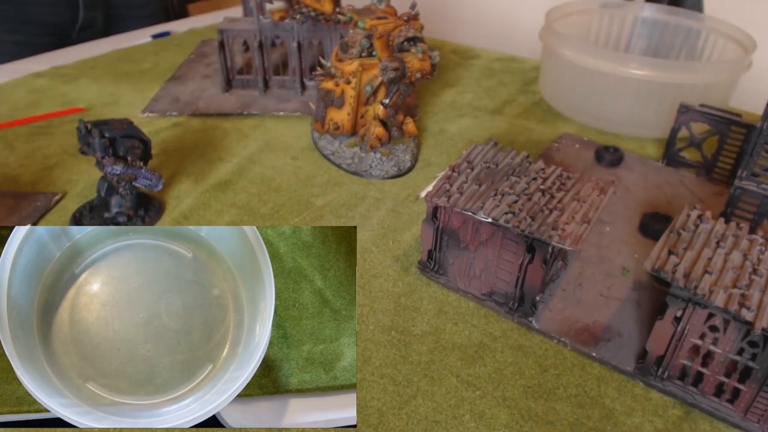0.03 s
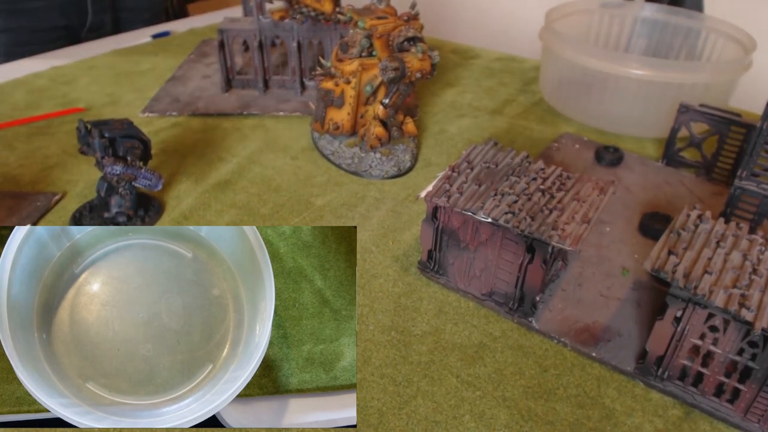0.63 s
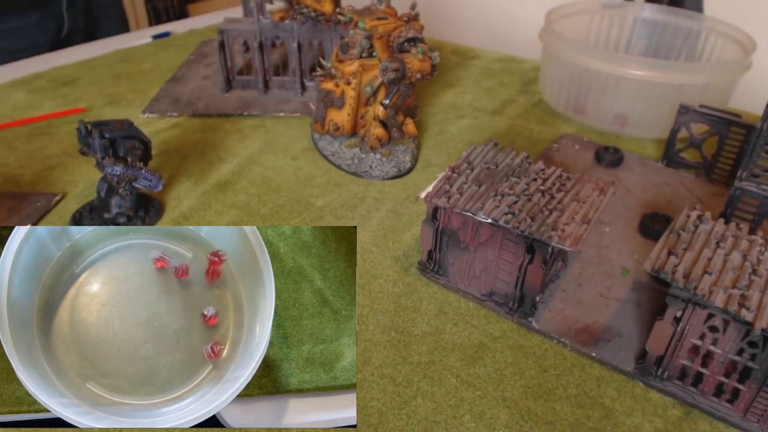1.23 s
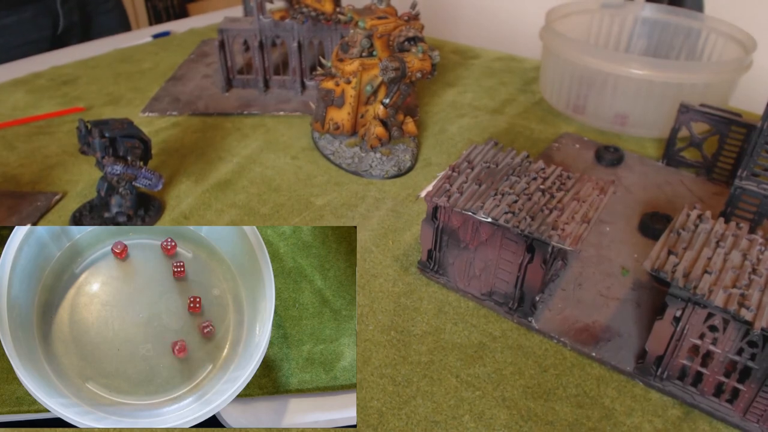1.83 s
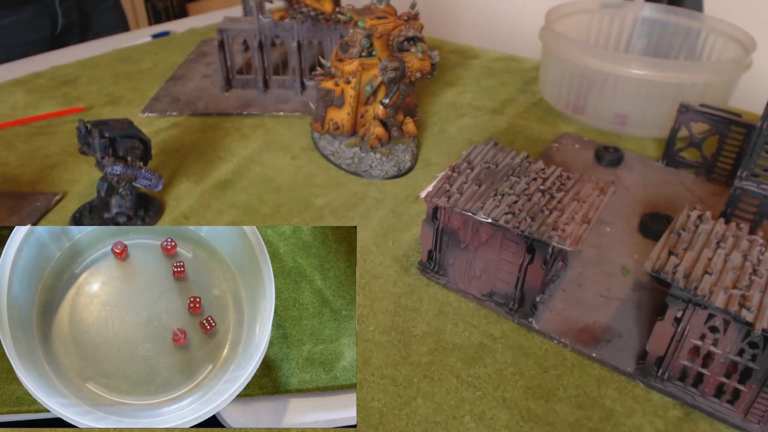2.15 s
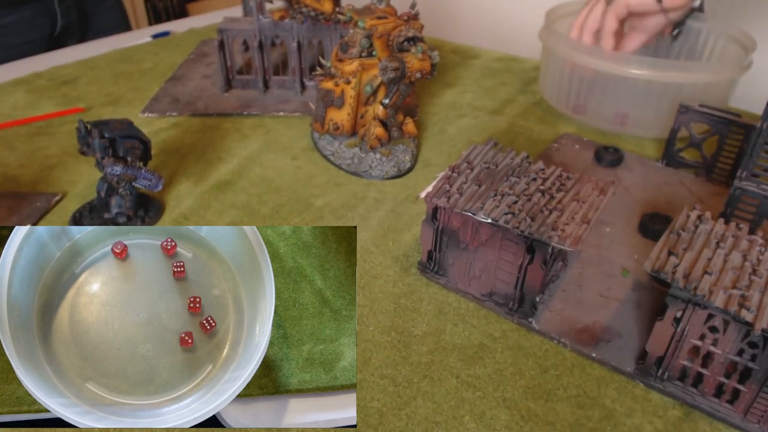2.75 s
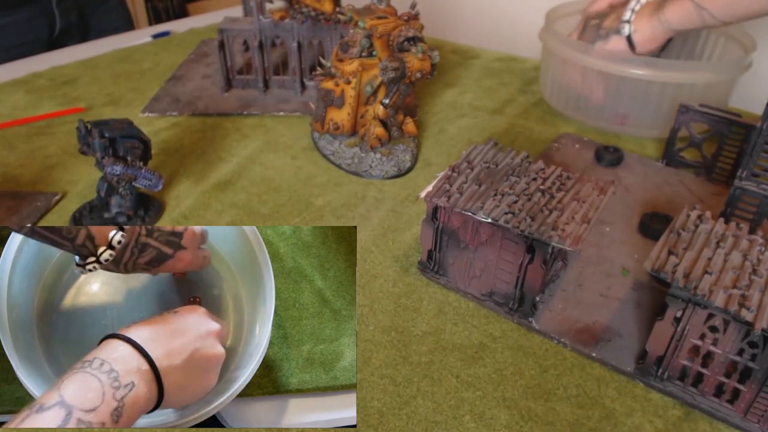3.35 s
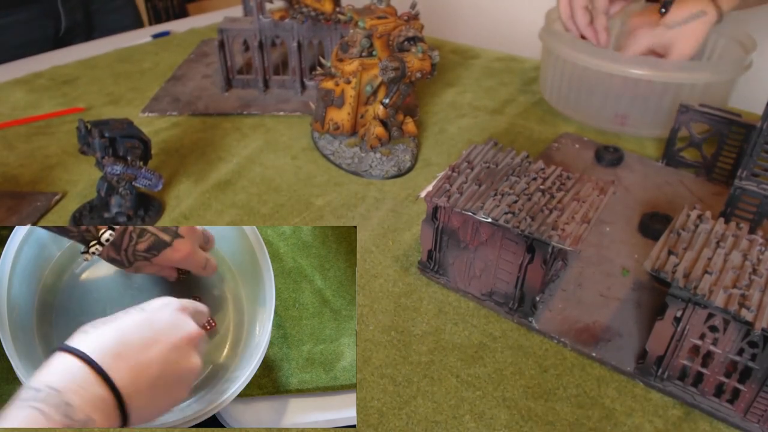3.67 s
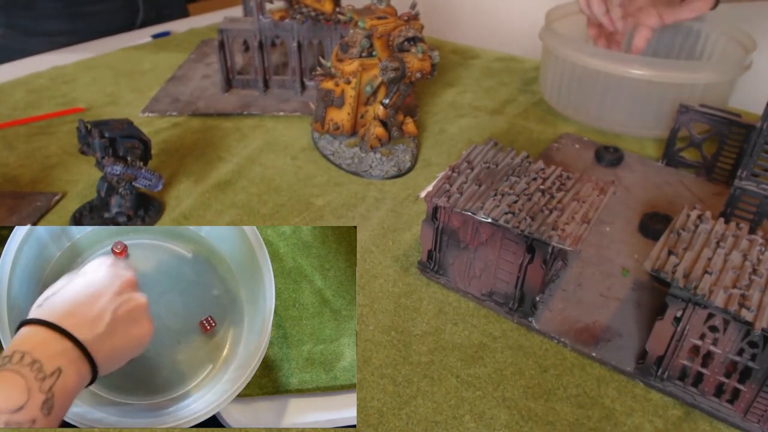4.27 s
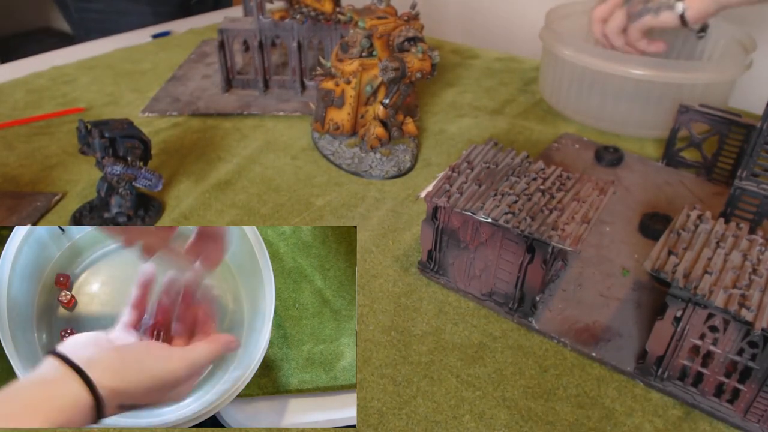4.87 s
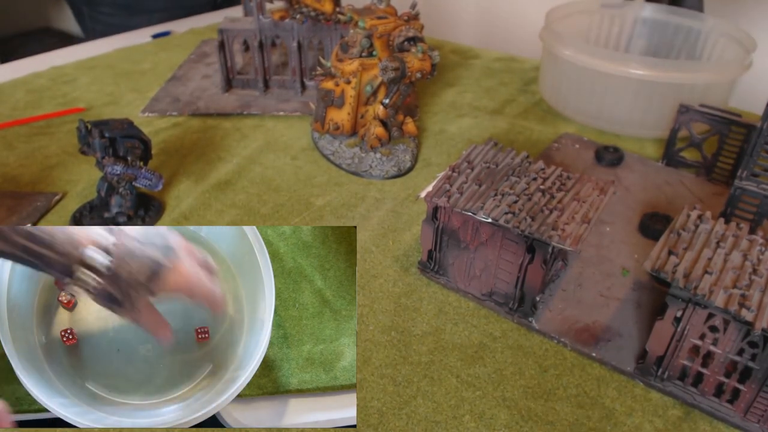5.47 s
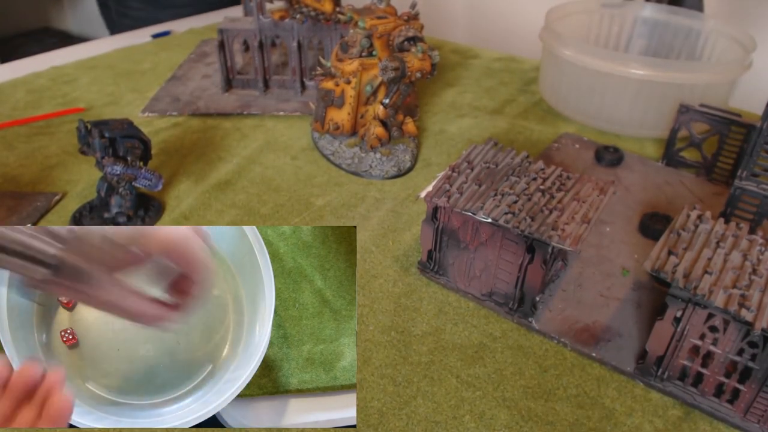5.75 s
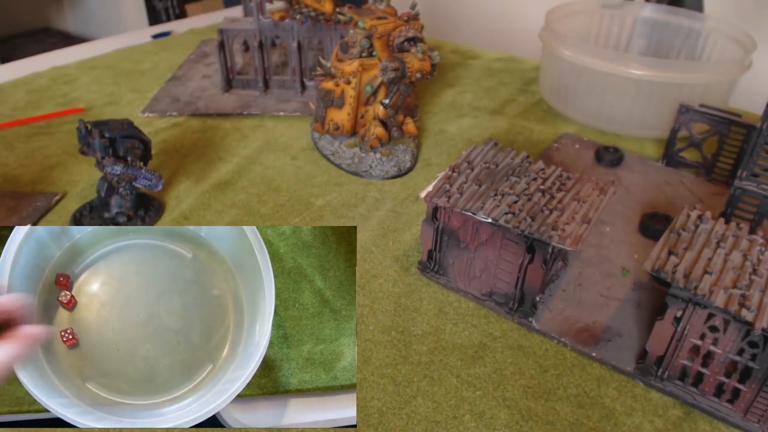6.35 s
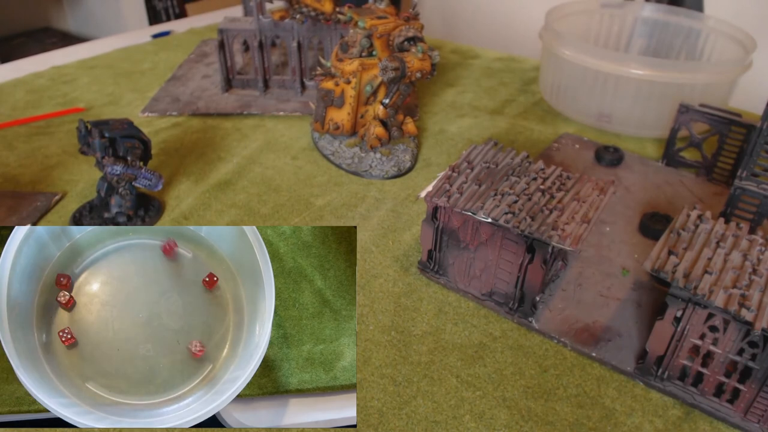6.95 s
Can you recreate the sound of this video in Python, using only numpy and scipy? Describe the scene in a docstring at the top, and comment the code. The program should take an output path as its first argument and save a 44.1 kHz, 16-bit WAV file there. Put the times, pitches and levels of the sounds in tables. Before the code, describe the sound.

Dice clatter into a plastic tub and spin to rest, are scooped up clicking, then get thrown in again.

```python
"""A click's hiss fades; dice stir in a hand, then clatter into a round plastic tub on a cloth-covered
table, and one spins on. Hands sweep them up, drop a few back, click them together and throw again.
Each blow flexes the tub's floor, cracks through its walls and leaves it ringing; die on die gives a short,
high ping. A small room answers, over faint hiss and mains buzz. The sound is nearly mono, and a gain
control ducks at the loud throws."""
import sys
import numpy as np
from scipy import signal
from scipy.fft import rfft, irfft
from scipy.io import wavfile

SR = 44100
rng = np.random.default_rng(int(sys.argv[2]) if len(sys.argv) > 2 else 0)


def store_pcm(level_fs):
    """Save levels as 16-bit WAV."""
    pcm = np.round(np.clip(level_fs, -1, 1) * 32767).astype(np.int16)
    wavfile.write(sys.argv[1], SR, np.atleast_2d(pcm).T)


N = 313551
TIME_S = np.arange(N) / SR
AGE_S = np.arange(int(.4 * SR)) / SR  # time since a hit
ATTACK_SAMPLES = int(.004 * SR)
TOP_HZ = 16200

# die hits tub, floor near 1200 Hz, wall near 2500 Hz: (time [s], level [dB], tick [dB], spot pitch [Hz])
BOUNCES = [(1.0864, -7, -12, 2090), (1.0882, -4, -9.5, 1960), (1.0922, -4.5, -16, 1260),
           (1.0978, -5.5, -10, 1130), (1.1172, -13, -8, 1210), (1.1222, -29, -24, 1080),
           (1.1619, -6, -15, 1125), (1.1705, -13, -12, 2400), (1.1885, -18, -10, 2470),
           (1.2604, -17.5, -16.5, 1660), (1.2975, -33, -15, 1260), (1.3173, -18.5, -10.5, 1200),
           (1.3316, -18.5, -11, 1250), (1.345, -16.5, -15.5, 1200), (1.3865, -25, -11, 1170),
           (1.4624, -32.5, -33, 1260), (1.4693, -31.5, -12.5, 1320), (1.5145, -27.5, -18, 1290),
           (1.5271, -28.5, -31, 1170), (1.5526, -32, -23, 1120), (1.571, -36.5, -32, 1100),
           (1.6033, -37.5, -17, 1040), (1.6249, -30, -15, 2820), (1.673, -36, -10, 1100),
           (1.7016, -42, -6, 1220), (1.7647, -47, -16, 1740), (1.8254, -43, -21.5, 1097),
           (2.0288, -38.5, -29.5, 1220), (2.177, -34.5, -25, 1803), (2.198, -43.5, -25, 1200),
           (2.5755, -46, -24.5, 1275), (2.5989, -44, -19.5, 1159), (2.6401, -58, -5.5, 1070),
           (3.3716, -41.5, -14.5, 1540), (3.377, -44.5, -26.5, 1530), (3.4491, -50, -18, 1370),
           (3.5138, -45.5, -26, 1225), (3.5608, -47.5, -15.5, 1390), (3.7468, -50.5, -25.5, 1030),
           (4.1535, -39.5, -25, 1700), (4.2126, -26, -14, 2600), (4.2802, -23.5, -17, 1980),
           (4.3091, -30, -12, 2580), (4.3745, -29, -14, 2600), (4.3765, -17, -15.5, 2520),
           (4.4055, -23, -21, 2500), (4.4513, -26, -12, 2820), (4.4983, -35.5, -29, 514),
           (4.504, -40, -29, 524), (4.5388, -42, -14, 1530), (4.5934, -42.5, -13, 2580),
           (4.6434, -34, -10.5, 2120), (4.6716, -38.5, -17.5, 745), (5.1735, -47, -12, 2580),
           (5.5771, -42, -20, 2000), (5.585, -39.5, -15, 699), (6.6793, -9.5, -13, 1205),
           (6.6807, -12.5, -9, 1140), (6.691, -10.5, -10.5, 2730), (6.7118, -20, -29, 2480),
           (6.7415, -17, -20, 2530), (6.7621, -26.5, -9, 1220), (6.783, -23, -19, 2520),
           (6.8001, -20.5, -11, 1300), (6.828, -22, -13.5, 1260), (6.8325, -27, -7, 1270),
           (6.841, -27, -16, 1230), (6.8937, -31.5, -15, 1280), (6.9385, -34.5, -21, 1310),
           (6.9745, -42.5, -33, 1260), (7.071, -37, -24, 2100), (7.0772, -29.5, -30, 2110),
           (7.1066, -28.5, -29, 2200)]
# second corner landing, weak after a hard bounce: (blow level [dB], relative level [dB])
SECOND_CORNER = [(-52.5, -0.5), (-16.5, -17)]
def knocks(count, ring_db=-19, corner_db=-2, low_cut_hz=130):
    """Dice strike the thin tub, which radiates little bass. Returns cracks by place, and tones."""
    cracks, tones = np.zeros((count, N)), np.zeros(N)
    modes = tub_modes()
    for k, (time_s, db, tick_db, hz) in enumerate(list(BOUNCES) + spins() + tumbles()):
        spot, wall = spot_flex(hz), wall_crack(db)
        corner_gain = undb(db + tick_db + corner_db)
        tick = corner_gain * corner_tick()
        tub = undb(db + ring_db) * tub_ring(modes)
        snap = corner_gain * corner_snap()
        body_gain = undb(db) / attack_rms(wall + spot)
        crack, flex = body_gain * high_pass(wall, 160), body_gain * spot
        add(cracks[k % count], time_s, crack + tick)
        add(tones, time_s, flex + tub + snap)
        second_gain = undb(np.interp(db, *np.transpose(SECOND_CORNER)))
        add(tones, time_s + rng.uniform(.0014, .006), second_gain * (crack + flex))
    return high_pass(cracks, low_cut_hz), high_pass(tones, low_cut_hz)


# flex of a struck spot: (pitch [Hz], t60 [s], level re wall [dB])
SPOT_FLEX = [(500, .03, -3.5), (1206, 0.023, -2), (2000, 0.015, -2), (2600, 0.01, 3)]
def spot_flex(hz):
    """The struck spot rings briefly; thin plastic pushes no air at low pitch."""
    tone = high_pass(ring(hz, along(SPOT_FLEX, hz)), 600, order=3)
    return undb(along(SPOT_FLEX, hz, column=2)) * unit_hit(tone)


# short, overlapping wall resonances: (frequency [Hz], level [dB])
WALL_SPECTRUM = [(60, -35), (150, -23), (400, -17.5), (500, 0.5), (740, -2.5), (850, -6.5), (1150, -1),
                 (1750, -1), (2000, 1), (2700, 0.5), (3100, -3.5), (5000, -16.5), (9000, -26.5),
                 (16000, -39.5)]
# brightness of a landing: (blow level [dB], cutoff [Hz])
WALL_CUTOFF = [(-43.5, 2200), (-40, 14000)]
def wall_crack(db):
    """A blow cracks through the walls; a gentle one pushes longer and sounds duller."""
    crack = colour(contact(scatter_db=2, t60_s=.019, build_s=.00039), WALL_SPECTRUM)
    return unit_hit(low_pass(crack, np.interp(db, *np.transpose(WALL_CUTOFF))))


# corner tick: (frequency [Hz], level [dB])
TICK_SPECTRUM = [(100, -40.5), (500, -21), (1500, -3.5), (3800, 4), (7000, 0), (11000, -7.5), (16000, -21)]
def corner_tick():
    """A hard corner lands with a bright tick."""
    return unit_hit(colour(contact(scatter_db=0, t60_s=.025), TICK_SPECTRUM))


def corner_snap():
    """The die itself gives a brief, high ping as its corner lands."""
    return unit_hit(high_pass(ring(rng.uniform(3600, 5600), .0014), 2500))


# tub resonances: (frequency [Hz], level [dB], t60 [s])
TUB_MODES = [(503, 7.5, .33), (572, 3, .26), (655, -3, .2), (718, -2, .2), (790, -6, .18), (920, -3, .22),
             (970, -2, .24), (1096, 1, .24), (1140, 0, .2), (1184, 0, .22), (1262, -3, .24),
             (1298, -1, .22), (1456, 2, .22), (1510, 0, .2), (1720, -4, .18), (1955, 0, .16),
             (2129, -1, .18), (2348, -3, .18), (2560, -1, .16), (2692, -1, .15)]
def tub_modes():
    """Free decay of the tub, one row per mode."""
    return np.array([undb(db) * ring(hz, t60_s) for hz, db, t60_s in TUB_MODES])


def tub_ring(modes, spread_db=2):
    """Where the die lands decides how strongly each mode takes up the blow."""
    polarity, strength = rng.standard_normal((2, len(modes)))
    weights = np.sign(polarity) * undb(spread_db * strength)
    return weights @ modes / np.sqrt(len(modes) / 2)


# spinning die: (start [s], end [s], first gap [s])
SPINS = [(1.94, 2.15, .046), (2.2567, 2.65, .0493)]
def spins(first_db=-43.5, fade_db_per_s=15.5, quicken_s=.0028):
    """A spinning die sinks, tapping corner after corner, sooner and softer."""
    rows = []
    for start_s, end_s, gap_s in SPINS:
        age_s = np.append(0, np.cumsum(gap_s - quicken_s * np.arange(14)))
        age_s = age_s[age_s < end_s - start_s]
        rows += taps(start_s + age_s, first_db - fade_db_per_s * age_s, tick_db=-20.5)
    return rows


# light tumbling between bounces: (start [s], end [s], first level [dB], last level [dB])
TUMBLES = [(1.12, 1.558, -36, -47.5), (1.662, 1.92, -49.5, -50), (3.463, 3.697, -57, -62.5),
           (4.218, 4.676, -49, -52), (6.72, 7.07, -33, -48)]
def tumbles(count=10):
    """Tumbling dice touch down at uneven moments and lose strength."""
    rows = []
    for start_s, end_s, first_db, last_db in TUMBLES:
        progress = (np.arange(count) + rng.random(count)) / count
        times_s = start_s + progress * (end_s - start_s)
        rows += taps(times_s, first_db + progress * (last_db - first_db), tick_db=-14)
    return rows


def taps(times_s, levels_db, tick_db, floor_hz=1220, spread_db=1.7, pitch_spread=.055):
    """Light, slightly varied blows on the tub's floor, as rows like BOUNCES."""
    jitter = rng.standard_normal((len(times_s), 2))
    return [(time_s, db + spread_db * force, tick_db, floor_hz * np.exp(pitch_spread * detune))
            for time_s, db, (force, detune) in zip(times_s, levels_db, jitter)]


# die on die in the hand: (time [s], level [dB], pitch [Hz])
CLICKS = [(0.095, -52, 7300), (0.9045, -50, 5830), (0.9567, -50, 4900), (0.9622, -45, 4670),
          (0.9691, -37, 9200), (0.9794, -37, 5650), (0.9963, -48, 5137), (3.762, -52.5, 2630),
          (3.7709, -45, 5100), (3.778, -49.5, 6030), (4.9254, -43, 6605), (5.2085, -55, 4740),
          (5.3137, -45, 5200), (5.4613, -53, 6840), (5.4866, -54, 6740), (5.6285, -47.5, 6160),
          (6.0067, -31, 7870), (6.0142, -38, 7000), (6.0491, -47, 5060), (6.0851, -47.5, 7200),
          (6.1009, -52, 6370), (6.1286, -37, 6080), (6.1421, -44, 4630), (6.1509, -44, 6000),
          (6.2052, -31.5, 8200), (6.209, -37, 8300), (6.4466, -49.5, 5340), (6.5305, -50.5, 6500),
          (6.566, -41.5, 7080), (6.5752, -42, 5350)]
# broad snap of a click: (frequency [Hz], level [dB])
SNAP_SPECTRUM = [(300, -30.5), (1200, -15.5), (2200, -2.5), (3000, -6), (4200, -1.5), (8000, 0),
                 (11000, -12), (16000, -22.5)]
# air resonances of the cupped hand: (frequency [Hz], level [dB], t60 [s])
HAND_MODES = [(2050, -1, 0.026), (3540, -0.5, .03), (4170, 0, .03), (5600, -1.5, .025)]
# lighter touches are duller: (click level [dB], cutoff [Hz])
CLICK_CUTOFF = [(-50, 9000), (-31, 15000)]
def clicks(count, ping_db=2, hollow_db=-10):
    """Die on die: a short ping and a snap, scattered by the cupped hand; one track per place."""
    out = np.zeros((count, N))
    for k, (time_s, db, hz) in enumerate(CLICKS):
        snap = unit_hit(colour(contact(scatter_db=0, t60_s=.075), SNAP_SPECTRUM))
        ping = unit_hit(high_pass(ring(hz, t60_s=.0026), 2100))
        hollow = unit_hit(sum(rng.choice([-1, 1]) * undb(mode_db) * ring(mode_hz, t60_s)
                              for mode_hz, mode_db, t60_s in HAND_MODES))
        click = snap + undb(ping_db) * ping + undb(hollow_db) * hollow
        cutoff_hz = np.interp(db, *np.transpose(CLICK_CUTOFF))
        add(out[k % count], time_s, undb(db) * unit_hit(low_pass(click, cutoff_hz, order=4)))
    return out


# skids on the wall: (peak [s], rise [s], fall [s], level [dB], pitch at peak [Hz], glide [Hz/s])
SKIDS = [(4.15, 0.05, .014, -42.5, 1860, 13997.5), (4.189, .035, 0.029, -40.5, 2405, 30000),
         (4.234, 0.03, 0.034, -42, 2000, -8000)]
def skid(width_hz=520, range_hz=(1200, 2820)):
    """Skidding dice chatter unevenly: a rough band whose pitch follows their speed."""
    roughness = low_pass(rng.standard_normal(N), width_hz)
    out = np.zeros(N)
    for peak_s, rise_s, fall_s, db, hz, glide_hz_per_s in SKIDS:
        pitch_hz = np.clip(hz + glide_hz_per_s * (TIME_S - peak_s), *range_hz)
        chatter = roughness * np.sin(2 * np.pi * np.cumsum(pitch_hz) / SR)
        out += unit(chatter) * stroke(peak_s, rise_s, fall_s, db)
    return out


# slides on the floor, spinning or swept by hand: (peak [s], rise [s], fall [s], level [dB])
DRAGS = [(2.1, .7, .9, -62), (3.56, 0.4, 0.45, -61), (4.22, 0.14, 0.062, -51), (4.62, 0.27, .14, -53),
         (5.2, 0.16, 0.29, -53), (5.6, 0.15, 0.075, -51.5)]
def drag(slips_per_s=1100, spread_db=3, ring_db=-16, cutoff_hz=2600):
    """Sliding dice catch and slip in tiny steps that sound through the tub."""
    slips = (rng.random(N) < slips_per_s / SR) * rng.standard_normal(N)
    slips *= undb(spread_db * rng.standard_normal(N))
    tub = unit_hit(sum(rng.choice([-1, 1]) * mode for mode in tub_modes()))
    wall = unit_hit(colour(contact(scatter_db=12, t60_s=.0079), WALL_SPECTRUM))
    scrape = signal.fftconvolve(slips, wall + undb(ring_db) * tub)[:N]
    return unit(low_pass(scrape, cutoff_hz, order=1)) * strokes(DRAGS)


# a click's fading hiss at the start, then dice rubbing in the palm or as they drop:
# (peak [s], rise [s], fall [s], level [dB])
DICE_HISSES = [(0, .02, 0.037, -42.5), (.097, 0.019, 0.054, -50), (.46, 0.058, 0.19, -63.5),
               (3.33, .2, .5, -70), (3.775, .017, 0.06, -49), (4.395, .02, .1, -44.5),
               (6.15, .03, 0.07, -55), (6.22, 0.022, 0.052, -50.5), (6.58, .25, .06, -66)]
# tone of that hiss: (frequency [Hz], level [dB])
DICE_HISS_SPECTRUM = [(1000, -26), (3500, -18), (5500, 2), (6700, 2), (8500, -6.5), (16000, -39)]
def dice_hiss(grain_db=4, grain_samples=90):
    """A fine, grainy hiss: the tail of a click, then dice grinding lightly together."""
    levels_db = grain_db * rng.standard_normal(N // grain_samples + 1)
    grain = undb(np.repeat(levels_db, grain_samples)[:N])
    return unit(colour(grain * rng.standard_normal(N), DICE_HISS_SPECTRUM)) * strokes(DICE_HISSES)


# arm movements: (peak [s], rise [s], fall [s], level [dB])
ARM_MOVES = [(.29, 0.085, 0.36, -62), (.68, 0.43, 0.44, -57.5), (1.07, 0.17, 0.081, -58),
             (2.78, .04, .09, -67), (5.28, 0.3, 0.34, -60.5), (6.32, .12, 0.27, -66.5),
             (6.56, .3, 0.25, -63)]
# sleeve rustle: (frequency [Hz], level [dB])
SLEEVE_SPECTRUM = [(60, -10.5), (200, -5), (500, 1), (1200, -1), (2500, -6), (6000, -16), (16000, -26.5)]
def sleeve():
    """A soft rustle as the arm moves over the tub."""
    return unit(colour(rng.standard_normal(N), SLEEVE_SPECTRUM)) * strokes(ARM_MOVES)


# reverberation: (frequency [Hz], level [dB], t60 [s])
ROOM_BANDS = [(150, -4.5, 0.34), (514, -1.5, 0.24), (1200, 9, 0.26), (2500, -7, 0.32), (4850, -4, 0.36),
              (8950, -8, .26), (15000, 3.5, 0.06)]
def room_tails(count=7, octaves=9, build_s=.0024):
    """Small-room reflections for several places; they build quickly and the top octave dies first."""
    noise = rfft(rng.standard_normal((count, len(AGE_S))))
    octave = np.log2(np.maximum(np.fft.rfftfreq(len(AGE_S), 1 / SR), 1))
    tails = 0
    for hz in TOP_HZ / 2 ** np.arange(octaves):
        band = irfft(noise * np.maximum(1 - abs(octave - np.log2(hz)), 0), len(AGE_S))
        tails += band * undb(along(ROOM_BANDS, hz)) * fade(along(ROOM_BANDS, hz, column=2))
    tails *= 1 - np.exp(-AGE_S / build_s)
    return tails / np.sqrt(np.sum(tails ** 2, axis=1, keepdims=True))


def diffuse(places, tails):
    """Smear each place's sound with its own tail, and sum."""
    return signal.oaconvolve(places, tails, axes=1)[:, :N].sum(axis=0)


# mains buzz: (frequency [Hz], harmonic level [dB])
BUZZ_SPECTRUM = [(60, -83.5), (120, -76), (180, -77.5), (240, -82), (300, -84), (420, -83), (600, -85),
                 (900, -97.5)]
# electronic hiss: (frequency [Hz], level [dB])
HISS_SPECTRUM = [(15, -37.5), (25, -8.5), (114, -1.5), (317, -4), (476, -5.5), (560, -10), (659, -8.5),
                 (775, -6), (4250, -12.5), (14000, -25), (16000, -36)]
def electronics(mains_hz=60, hiss_db=-64.5):
    """Hiss, and mains harmonics that line up into one soft pulse a cycle."""
    buzz = sum(undb(along(BUZZ_SPECTRUM, hz)) * np.sqrt(2) * np.cos(2 * np.pi * hz * TIME_S)
               for hz in mains_hz * np.arange(1, 15))
    return buzz + undb(hiss_db) * unit(colour(rng.standard_normal(N), HISS_SPECTRUM))


def contact(scatter_db, t60_s, build_s=.002):
    """An impulse and its fading scatter from nearby surfaces."""
    scatter = rng.standard_normal(len(AGE_S)) * fade(t60_s) * (1 - np.exp(-AGE_S / build_s))
    return (AGE_S == 0) + undb(scatter_db) * scatter / np.sqrt(np.sum(scatter ** 2))


def ring(hz, t60_s):
    """One struck resonance."""
    return np.sin(2 * np.pi * hz * AGE_S) * fade(t60_s)


def fade(t60_s):
    """Exponential decay."""
    return np.exp(-np.log(1000) * AGE_S / t60_s)


def stroke(peak_s, rise_s, fall_s, db, depth_db=20):
    """Gain of one swell: up by depth_db over rise_s, down as much over fall_s."""
    distance = np.maximum((peak_s - TIME_S) / rise_s, (TIME_S - peak_s) / fall_s)
    return undb(db - depth_db * np.minimum(distance, 10))


def strokes(rows):
    """Gain of a series of swells."""
    return np.max([stroke(*row) for row in rows], axis=0)


def colour(x, points, size=1024):
    """Minimum-phase filter shaped by (frequency [Hz], level [dB]) points."""
    gain = undb(along(points, np.fft.rfftfreq(size, 1 / SR)))
    cepstrum = irfft(np.log(gain))
    cepstrum[1:size // 2] *= 2
    cepstrum[size // 2 + 1:] = 0
    return signal.fftconvolve(x, irfft(np.exp(rfft(cepstrum))))[:len(x)]


def along(points, hz, column=1):
    """Read a table at hz, on a log-frequency scale."""
    columns = np.transpose(points)
    return np.interp(np.log(np.maximum(hz, 1)), np.log(columns[0]), columns[column])


def high_pass(x, hz, order=2):
    """Cut below hz."""
    return signal.sosfilt(signal.butter(order, hz, "high", fs=SR, output="sos"), x)


def low_pass(x, hz, order=2):
    """Cut above hz."""
    return signal.sosfilt(signal.butter(order, hz, fs=SR, output="sos"), x)


def undb(db):
    """Decibels to gain."""
    return 10 ** (np.asarray(db) / 20)


def unit(x):
    """Scale to rms 1."""
    return x / np.sqrt(np.mean(x ** 2))


def attack_rms(x):
    """Strength of a hit's onset."""
    return np.sqrt(np.mean(x[:ATTACK_SAMPLES] ** 2))


def unit_hit(x):
    """Scale to attack rms 1."""
    return x / attack_rms(x)


def add(track, time_s, sound):
    """Mix a sound in at time_s."""
    start = int(np.clip(time_s * SR, 0, N - 1))
    track[start:start + len(sound)] += sound[:N - start]


def scene(tub_room_db=-5.5, hand_room_db=-9, side_db=-4, side_above_hz=6200):
    """Everything is centred, with a slight stereo spread in the treble of the hits."""
    tails = room_tails()
    cracks, tones = knocks(len(tails))
    hand = clicks(len(tails))
    # cracks radiate all round and wake the room; the flexing spot is heard straight on
    send = undb(tub_room_db) * cracks + undb(hand_room_db) * hand
    direct = (cracks + hand).sum(axis=0) + tones
    mid = direct + diffuse(send, tails) + drag() + skid() + dice_hiss() + sleeve() + electronics()
    side = undb(side_db) * high_pass(diffuse(send, room_tails()), side_above_hz, order=6)
    return np.array([mid + side, mid - side])


def record(dry, threshold_db=-27, depth_db=6, recover_db_per_s=.39, window_s=.05):
    """Gain control ducks at a loud throw and creeps back; the tallest peaks clip and the top is cut."""
    pole = np.exp(-1 / (window_s * SR))
    power = signal.lfilter([1 - pole], [1, -pole], np.mean(dry, axis=0) ** 2)
    over_db = np.clip(10 * np.log10(power + 1e-18) - threshold_db, 0, depth_db)
    recovery_db = recover_db_per_s * TIME_S
    held_db = np.maximum.accumulate(over_db + recovery_db) - recovery_db
    # the gain lags, so the first blow gets through
    gain = undb(-signal.lfilter(np.ones(ATTACK_SAMPLES) / ATTACK_SAMPLES, 1, held_db))
    top_cut = signal.ellip(8, .2, 70, TOP_HZ, fs=SR, output="sos")
    return signal.sosfilt(top_cut, np.clip(dry * gain, -1, 1))


dry = scene()
out = record(dry)
store_pcm(out)
```